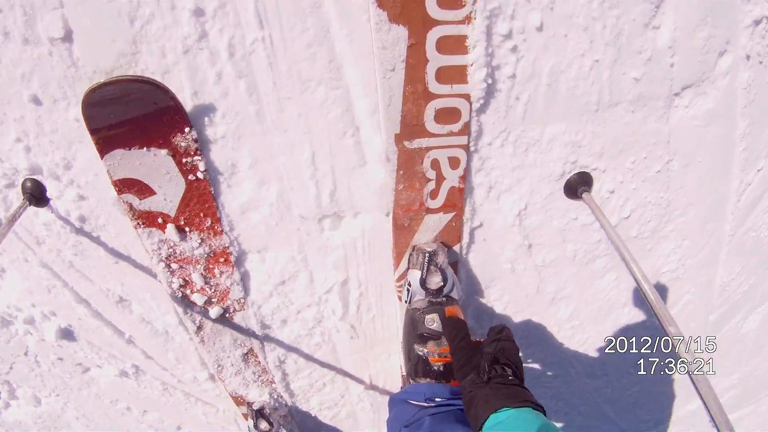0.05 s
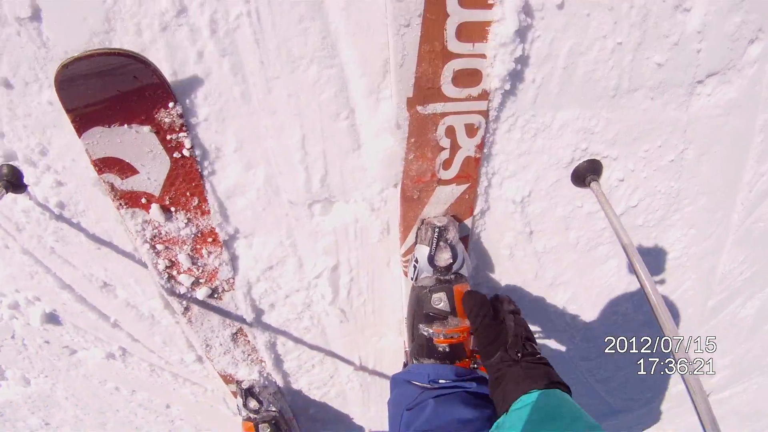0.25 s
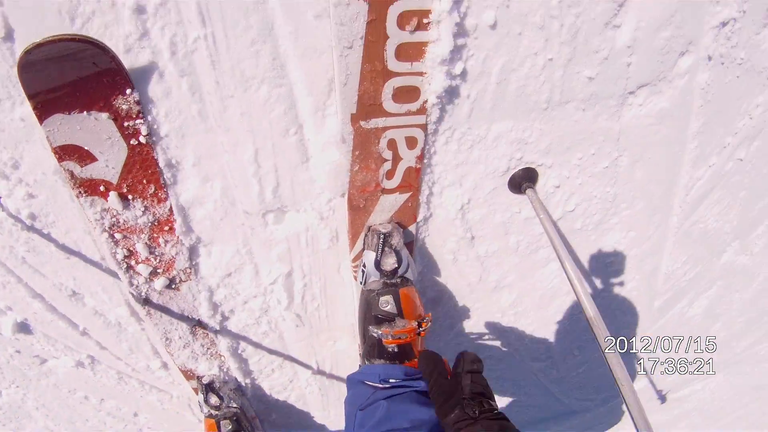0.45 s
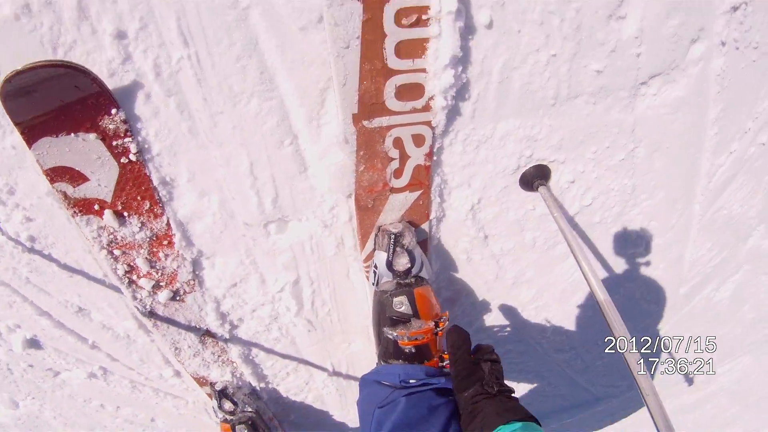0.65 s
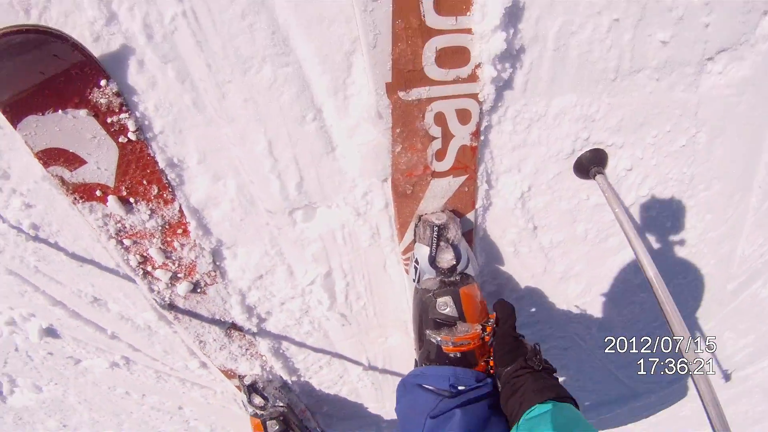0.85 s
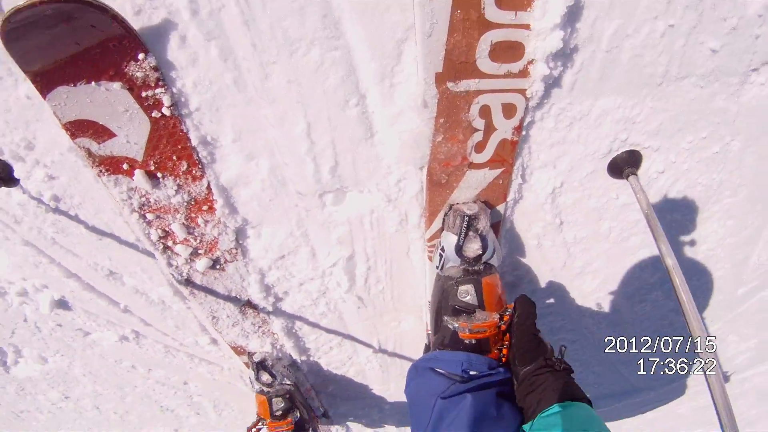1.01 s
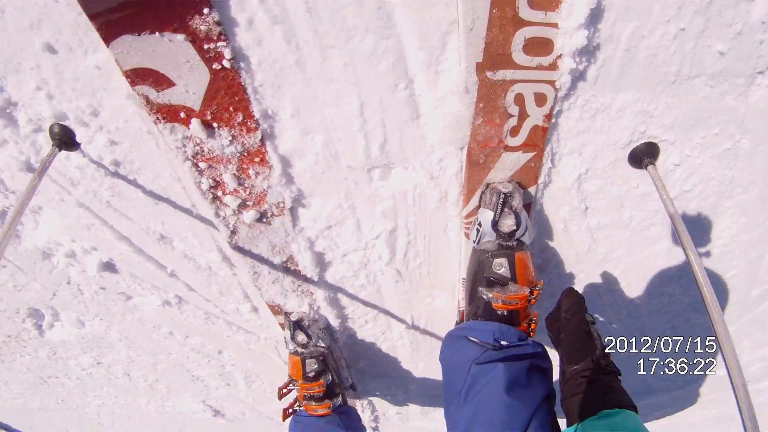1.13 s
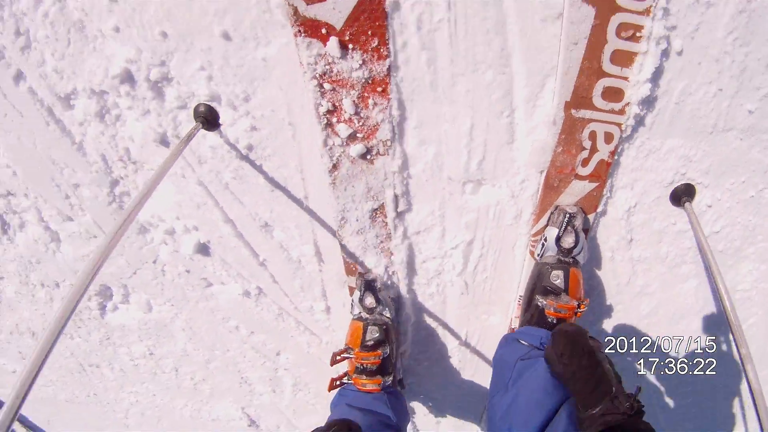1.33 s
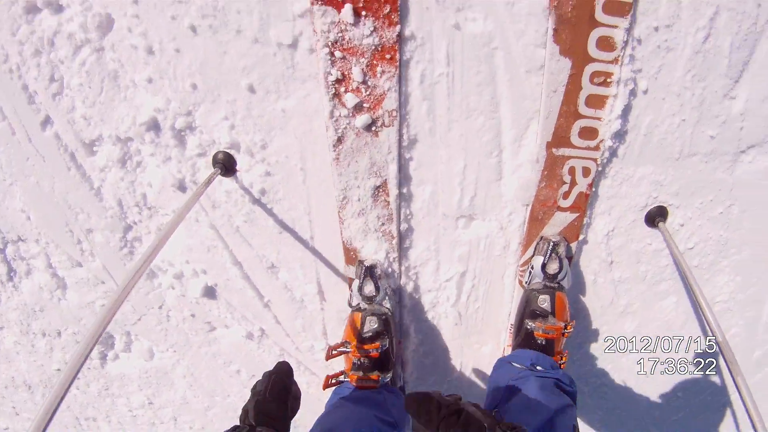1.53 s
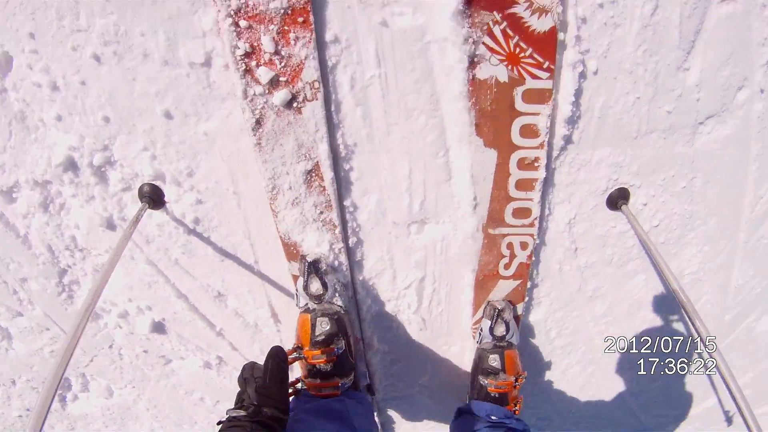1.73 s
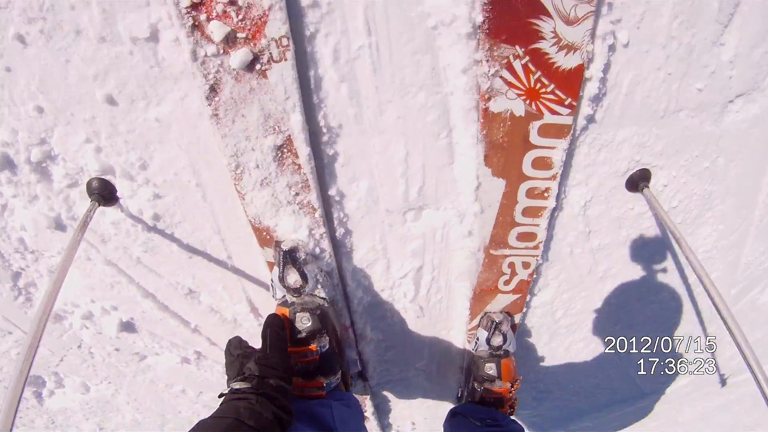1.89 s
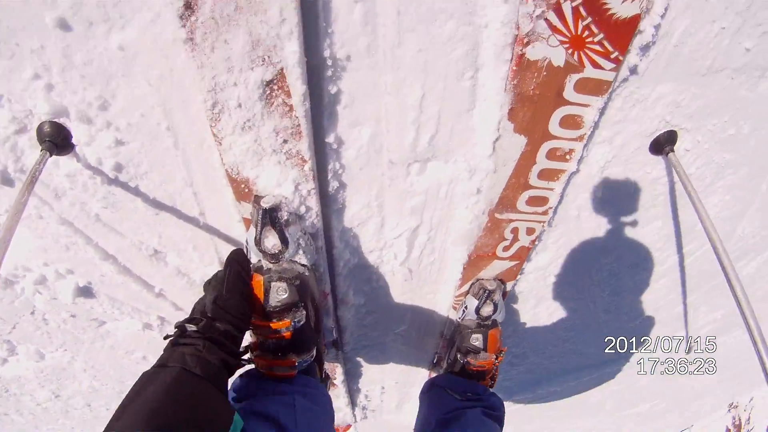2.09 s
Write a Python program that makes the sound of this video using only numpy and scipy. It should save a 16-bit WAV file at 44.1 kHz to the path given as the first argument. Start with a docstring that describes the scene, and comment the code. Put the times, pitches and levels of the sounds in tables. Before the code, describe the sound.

A ski boot buckle closes with a sharp click, its strap ticks and squeaks faintly, and a second buckle snaps shut. Heard up close outdoors, skis scuff and crunch on snow against a light, even hiss.

```python
"""Two ski boot buckles snap shut, one after the other: a catch slips, a lever strikes home and rings.
Catch and strap tick under tension; the strap squeaks as it tightens.
The skis scuff, slide and crunch on packed snow, with low thuds as the skier's weight shifts.
Snow, ticks and rattle ring through the plastic case of a nearby camera.
Behind it all: steady hiss and the camera's faint hum."""
import sys
import numpy as np
from scipy import signal
from scipy.fft import rfft, irfft
from scipy.io import wavfile

SR = 44100
rng = np.random.default_rng(int(sys.argv[2]) if len(sys.argv) > 2 else 0)


def dump_mix(stems):
    """Bounce the given channels to the path in sys.argv[1] as a 16-bit WAV at rate SR."""
    frames = np.atleast_2d(stems).T  # one column per channel
    limited = np.clip(frames, -1, 1)  # hard clip at full scale
    pcm = np.round(limited * 32767).astype(np.int16)
    wavfile.write(sys.argv[1], SR, pcm)


N = 94815

# Hiss spectrum: freq_hz, gain_db
HISS_COLOUR = [(20, -2), (60, -3), (110, -4.5), (170, 5.5), (300, 0.5), (480, -0.5), (800, 0.5), (1050, 1),
               (1500, 7.5), (2100, -8), (3800, 2), (6800, 3), (8500, 7.5), (11500, -4.5), (15500, -6.5)]
# Camera hum partials: pitch_hz, level_db
HUM_PARTIALS = [(119.2, -93.5), (238.3, -75.5), (357.5, -87.5), (596, -86), (715.2, -74), (838, -79.5),
                (1043, -81.5), (1192, -74), (1669, -76)]
# Camera case resonances: freq_hz, gain_db, t60_s
CASE_MODES = [(882, -7, .025), (1285, -6.5, 0.0073), (1496, 2, 0.016), (2058, 2, 0.02), (2560, -4, 0.0049),
              (2983, -2.5, 0.0084), (3490, 2.5, 0.0089), (4180, 0.5, 0.0039), (4780, -0.5, 0.002),
              (6150, -9, 0.013), (7750, 4, 0.0057), (8740, 4, 0.0084), (9920, -1.5, 0.0061),
              (11000, -8.5, 0.0084)]
# Body-borne thuds: centre_s, half_length_s, pitch_hz, level_db
THUDS = [(.28, 0.02, 170, -71), (1.004, 0.012, 164.3, -62.5), (1.045, 0.032, 33.3, -75),
         (1.313, 0.11, 186.5, -69), (1.623, .025, 165, -71), (1.825, 0.006, 131.7, -59),
         (2.083, 0.017, 159.5, -71)]
# Ski and glove scuffs: centre_s, half_length_s, level_db
SCUFFS = [(.03, 0.048, -58), (.068, 0.0082, -54.5), (0.165, 0.07, -55.5), (0.286, 0.0086, -50.5),
          (0.507, 0.024, -57.5), (.68, 0.013, -55.5), (0.742, .016, -49), (1.019, 0.018, -50),
          (1.117, 0.031, -57), (1.664, 0.011, -56), (1.76, .008, -53.5), (1.913, 0.024, -54),
          (2.013, 0.028, -55.5), (2.082, 0.0059, -49.5)]
# Long ski slide: time_s, level_db
SLIDE_ENVELOPE = [(1.15, -67.5), (1.2, -52), (1.28, -50), (1.38, -52), (1.5, -57), (1.65, -55), (1.72, -63),
                  (1.8, -58.5), (1.97, -65), (2.05, -65.5)]
# Slide and scuff spectrum before the case: freq_hz, gain_db
SLIDE_COLOUR = [(200, 37), (500, 15), (850, 11.5), (1500, 2.5), (2100, 7), (2600, 9.5), (3500, 2),
                (5000, -5), (8000, -11.5), (15000, -27)]
# Snow crunch under the skis: time_s, level_db
CRUNCH_ENVELOPE = [(0, -60.5), (.2, -62.5), (.34, -57.5), (.45, -60), (.54, -62), (.59, -74), (.63, -62),
                   (.74, -53.5), (.76, -65), (.83, -53.5), (.95, -52), (1.02, -58), (1.05, -68), (1.1, -66),
                   (1.22, -58.5), (1.6, -55), (1.72, -58), (1.79, -51), (1.92, -53), (1.99, -57),
                   (2.15, -63.5)]
# Crunch spectrum before the case: freq_hz, gain_db
CRUNCH_COLOUR = [(200, 40), (850, -20.5), (1500, 3), (2100, 7), (3200, -4), (4700, -0.5), (6500, 1),
                 (8500, -3.5), (11000, -1), (15000, 10)]
# Strap squeak: time_s, pitch_hz, level_db
SQUEAK_PATH = [(.765, 5050, -66), (.79, 4940, -58.5), (0.824, 4790, -58), (0.859, 4520, -65),
               (.88, 4530, -69)]
# Catch and strap ticks: start_s, level_db, treble_db
TICKS = [(0.2785, -32, -6), (0.3215, -26, 3), (0.3267, -30.5, 12), (0.3448, -24, -7), (0.6139, -29.5, 9.5),
         (0.62, -34.5, 6), (0.7717, -25, 2.5), (.7870, -27, -15), (0.801, -25.5, 3), (.8225, -25, -4),
         (.8415, -21, -10), (0.851, -21.5, -14), (.8640, -24, -7), (0.8696, -21, -8), (0.8785, -19.5, -22),
         (0.8953, -19, -11), (.9047, -16.5, 0.5), (0.9207, -25, -3), (0.9468, -16, -17), (.9707, -27, 11),
         (1.012, -22, 0), (1.0193, -14.5, -14), (1.395, -22.5, -23), (1.7535, -22, -18), (2.0763, -20, -8)]
# Tick spectrum before the case: freq_hz, gain_db
TICK_COLOUR = [(500, 1), (1500, 5.5), (2200, 2), (3200, -1.5), (4600, -1.5), (6500, -0.5), (8500, 0),
               (11000, -2), (15000, -5)]
# Ringing modes of two buckles, with a level for each snap: freq_hz, t60_s, first_snap_db, second_snap_db
BUCKLE_MODES = [(610, 0.018, -23.0, -6.4), (860, 0.0801, -2.5, -1.4), (1240, 0.0319, -6.3, 8.2),
                (1510, 0.0217, 11.3, 11.3), (1850, 0.0023, 0.9, 3.4), (2090, 0.0255, 19.0, 2.8),
                (2590, 0.0241, 6.7, -1.9), (2860, 0.0349, 6.1, 9.8), (3110, 0.0114, 12.4, 8.7),
                (3600, 0.0121, 10.2, 8.0), (4170, 0.0186, 11.9, 7.8), (4580, 0.0058, 13.9, 10.7),
                (5320, 0.0496, -1.4, -1.6), (6160, 0.015, 1.0, 2.6), (7810, 0.0073, 13.8, 6.2),
                (8640, 0.0074, 15.8, 7.3), (9820, 0.0082, 10.4, 6.7), (11150, 0.0119, -4.6, -5.9),
                (13490, 0.004, -6.0, -21.3), (14890, 0.0078, -18.0, -13.6)]
# Snaps, one per buckle: strike_s, slip_db, shake_db, rebound_delay_s, rebound_db
SNAPS = [(.2476, -15, -14, .00438, -12), (.98234, -11, -10, .00604, -14)]

HIT_SAMPLES = 4096


def amp(db):
    """Decibels to gain."""
    return 10 ** (np.asarray(db) / 20)


def unit_rms(x):
    """Scale to rms 1."""
    return x / np.sqrt(np.mean(x ** 2) + 1e-20)


def clock(size=N):
    """Sample times in seconds."""
    return np.arange(size) / SR


def envelope(points):
    """Gain over time from (time_s, level_db) points."""
    return amp(np.interp(clock(), *np.transpose(points)))


def add(mix, start_s, sound):
    """Mix a sound in at start_s."""
    part = mix[round(start_s * SR):][:len(sound)]
    part += sound[:len(part)]


def coloured(x, points):
    """Filter by (freq_hz, gain_db) points."""
    hz, db = np.transpose(points)
    bins_hz = np.fft.rfftfreq(len(x), 1 / SR)
    gain = amp(np.interp(np.log(bins_hz + 1), np.log(hz), db))
    return irfft(rfft(x) * gain, len(x))


def cut(x, hz, kind="low", order=2):
    """Butterworth low-pass or high-pass."""
    return signal.sosfilt(signal.butter(order, hz, kind, fs=SR, output="sos"), x)


def treble_shelf(x, treble_db):
    """First-order treble boost or cut."""
    return x + (amp(treble_db) - 1) * cut(x, 5700, "high", order=1)


def drift(hz):
    """Random motion below hz, rms 1."""
    rolloff = 1 + (np.fft.rfftfreq(N, 1 / SR) / hz) ** 4
    return unit_rms(irfft(rfft(rng.standard_normal(N)) / rolloff, N))


def mode(hz, t60_s, rise_s):
    """Decaying ring, gain 1 at its pitch."""
    t = clock(HIT_SAMPLES)
    fade = (1 - np.exp(-(t / rise_s) ** 2)) * amp(-60 * t / t60_s)
    return 2 * fade / fade.sum() * np.sin(2 * np.pi * hz * t)


def burst(shape):
    """Shaped noise, energy 1."""
    x = shape * rng.standard_normal(len(shape))
    return x / np.linalg.norm(x)


def camera_case(x, leak_db=-32.5):
    """Sound passes the ringing case walls; a little leaks straight in."""
    ring = sum((-1) ** k * amp(db) * mode(hz, t60_s, rise_s=0.000084)
               for k, (hz, db, t60_s) in enumerate(CASE_MODES))
    inside = signal.fftconvolve(x, ring)[:N] + amp(leak_db) * x
    return cut(inside, 650, "high", order=3)


def hiss(level_db=-62, edge_hz=15370):
    """Steady coloured noise with a steep top edge."""
    noise = coloured(rng.standard_normal(N), HISS_COLOUR)
    return amp(level_db) * unit_rms(cut(noise, edge_hz, order=24))


def camera_hum(waver=0.05):
    """Thin hum; each partial wavers in level."""
    out = np.zeros(N)
    for hz, db in HUM_PARTIALS:
        gain = np.sqrt(2) * amp(db) * (1 + waver * drift(hz=3.9))
        out += gain * np.sin(2 * np.pi * (hz * clock() + rng.random()))
    return out


def thuds(pitch_spread=0.19):
    """Weight shifts, carried through the body to the camera as soft low thuds."""
    t, out = clock(), np.zeros(N)
    for centre_s, half_s, hz, db in THUDS:
        cycles = np.cumsum(hz * (1 + pitch_spread * drift(hz / 2))) / SR
        swell = amp(db) * np.exp(-((t - centre_s) / half_s) ** 2)
        out += swell * np.sin(2 * np.pi * cycles)
    return out


def snow(colour, grain_share, grains_per_s=2000, spread_db=3, flutter_db=1):
    """Crystals of uneven size break amid fine rubbing noise; heard through the case, rms 1."""
    sizes = amp(spread_db * np.minimum(rng.exponential(1, N), 4))
    grains = sizes * rng.choice([-1, 1], N) * (rng.random(N) < grains_per_s / SR)
    rubbing = rng.standard_normal(N)
    drive = np.sqrt(grain_share) * unit_rms(grains) + np.sqrt(1 - grain_share) * rubbing
    flutter = amp(flutter_db * drift(hz=44.5))
    return unit_rms(camera_case(coloured(drive * flutter, colour)))


def ski_slide():
    """Dull friction: short scuffs and one long slide, summed in power."""
    scuff_power = sum((amp(db) * np.exp(-((clock() - centre_s) / half_s) ** 2)) ** 2
                      for centre_s, half_s, db in SCUFFS)
    gain = np.sqrt(envelope(SLIDE_ENVELOPE) ** 2 + scuff_power)
    return gain * snow(SLIDE_COLOUR, grain_share=0.27)


def snow_crunch():
    """Snow gives under the skis: brighter and grainier than the slide."""
    return envelope(CRUNCH_ENVELOPE) * snow(CRUNCH_COLOUR, grain_share=0.55)


def strap_squeak(pitch_spread=0.0284):
    """Stick-slip of the tightening strap: a rough, slowly falling whistle."""
    t = clock()
    time_s, pitch_hz, level_db = np.transpose(SQUEAK_PATH)
    hz = np.interp(t, time_s, pitch_hz) * (1 + pitch_spread * drift(hz=400))
    gain = amp(np.interp(t, time_s, level_db)) * (t > time_s[0]) * (t < time_s[-1])
    roughness = 1 + 0.5 * drift(hz=150)
    return gain * roughness * np.sin(2 * np.pi * np.cumsum(hz) / SR)


def catch_ticks(t60_s=0.016):
    """Small gritty blows of catch and strap, heard through the case."""
    t, out = clock(HIT_SAMPLES), np.zeros(N)
    blow = 0.5 * signal.unit_impulse(HIT_SAMPLES)
    for start_s, db, treble_db in TICKS:
        grit = burst(amp(-60 * t / t60_s))
        add(out, start_s, amp(db) * treble_shelf(blow + grit, treble_db))
    return camera_case(coloured(out, TICK_COLOUR))


def buckle_snaps(slip_s=0.001, shake_t60_s=0.035, rebound_cutoff_hz=2000):
    """Each buckle's catch slips; its lever strikes home, rings, rebounds dully and shakes the boot."""
    ringing, rattle = np.zeros((2, N))
    t = clock(HIT_SAMPLES)
    for snap, (strike_s, slip_db, shake_db, delay_s, rebound_db) in enumerate(SNAPS):
        ring = sum((-1) ** k * amp(snap_db[snap]) * mode(hz, t60_s, rise_s=0.00023)
                   for k, (hz, t60_s, *snap_db) in enumerate(BUCKLE_MODES))
        rebound = cut(ring, rebound_cutoff_hz, order=1)
        slip = burst(np.exp(-(t / slip_s) ** 2))
        shake = treble_shelf(burst(amp(-60 * t / shake_t60_s)), treble_db=-5)
        add(ringing, strike_s, ring)
        add(ringing, strike_s + delay_s, amp(rebound_db) * rebound)
        add(rattle, strike_s - slip_s, amp(slip_db) * slip)
        add(rattle, strike_s, amp(shake_db) * shake)
    return cut(ringing, 580, "high", order=4) + camera_case(rattle)


def scene():
    """All sources at one microphone."""
    boot = buckle_snaps() + catch_ticks() + strap_squeak()
    shuffle = ski_slide() + snow_crunch() + thuds()
    background = hiss() + camera_hum()
    return (boot + shuffle + background)[None]


def record(dry, edge_hz=15700):
    """Band limit: steep low-pass."""
    lowpass = signal.firwin(511, edge_hz, window=("kaiser", 9), fs=SR)
    return signal.oaconvolve(dry, lowpass[None], "same")


dry = scene()
out = record(dry)
dump_mix(out)
```